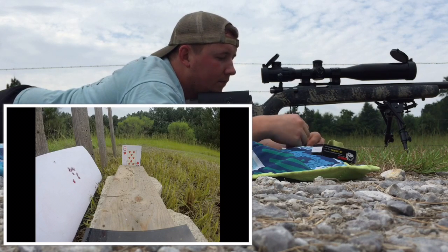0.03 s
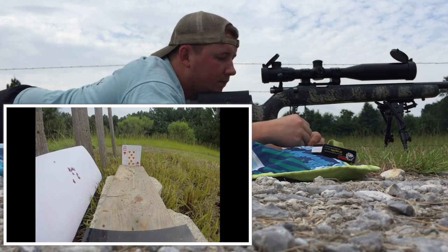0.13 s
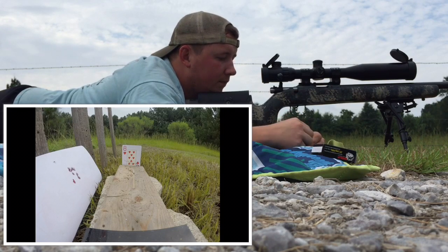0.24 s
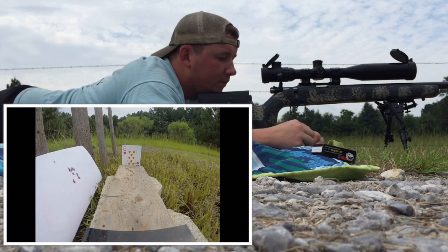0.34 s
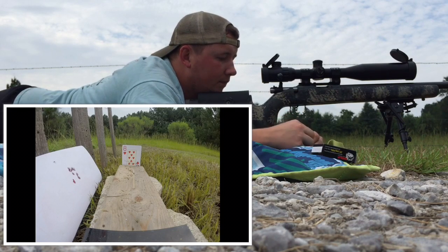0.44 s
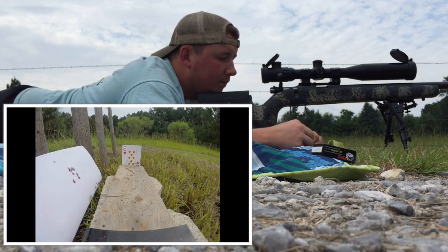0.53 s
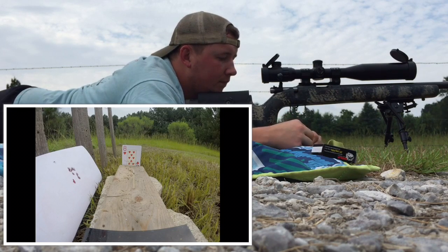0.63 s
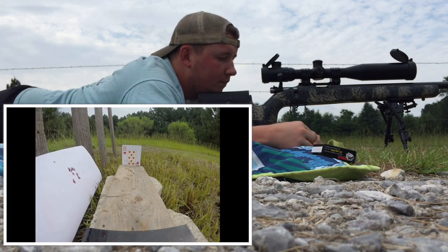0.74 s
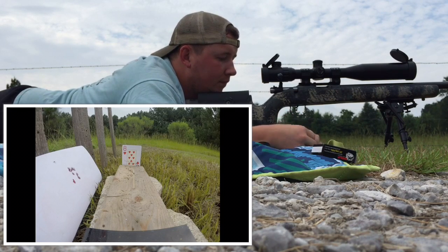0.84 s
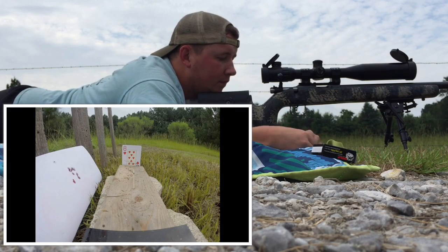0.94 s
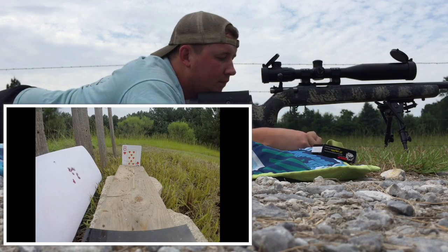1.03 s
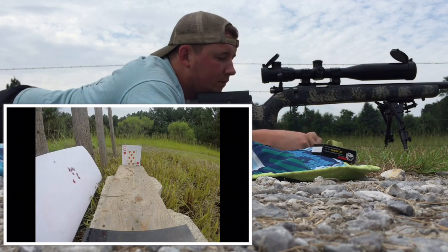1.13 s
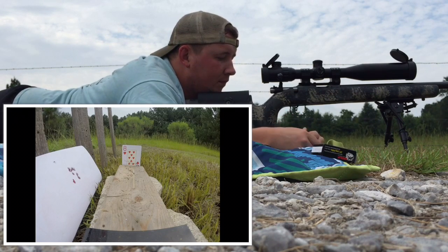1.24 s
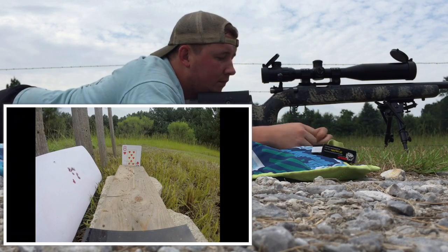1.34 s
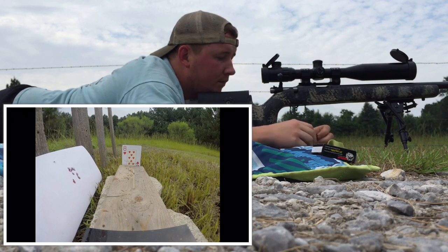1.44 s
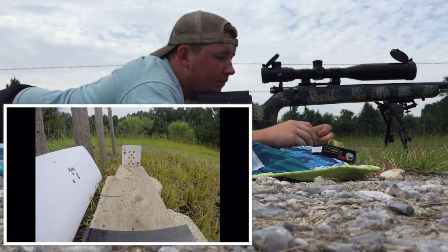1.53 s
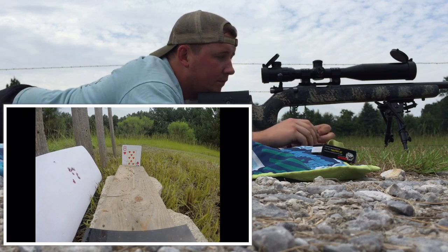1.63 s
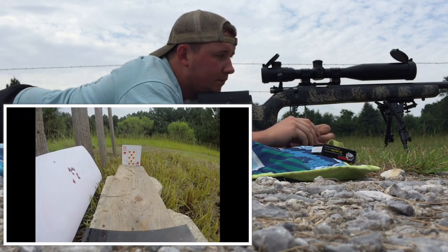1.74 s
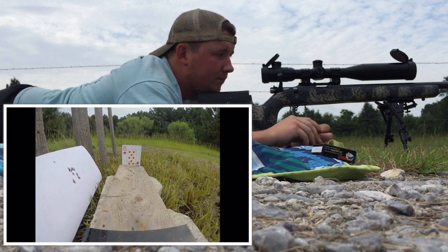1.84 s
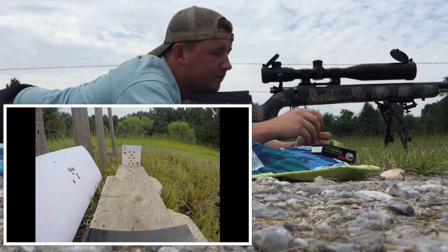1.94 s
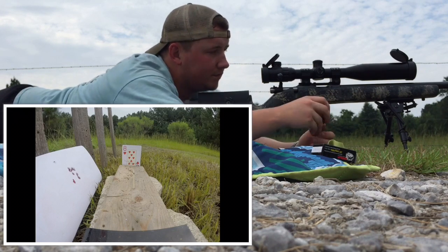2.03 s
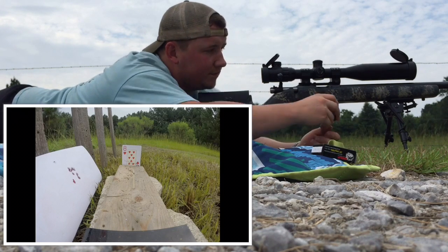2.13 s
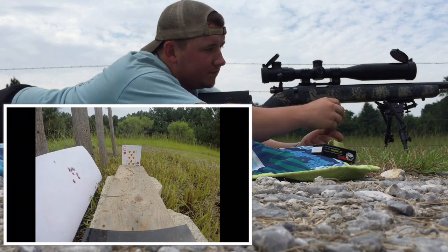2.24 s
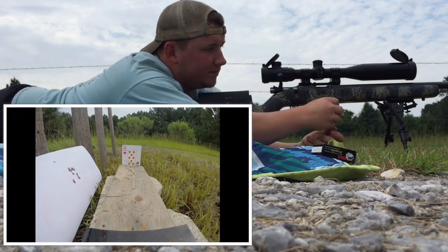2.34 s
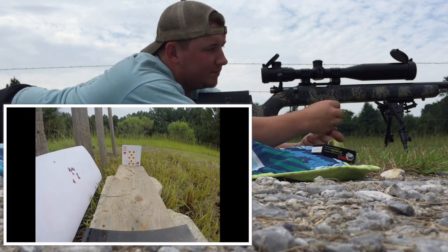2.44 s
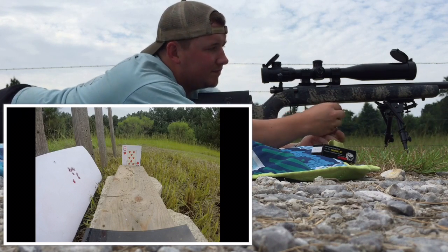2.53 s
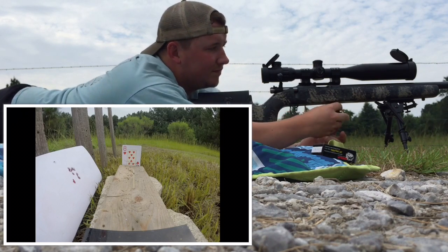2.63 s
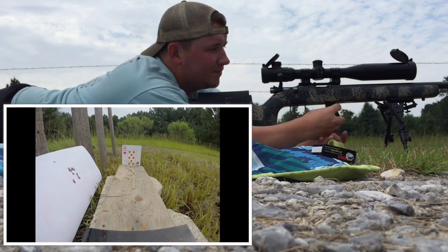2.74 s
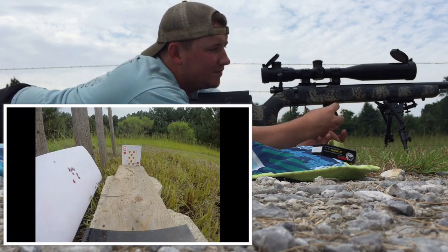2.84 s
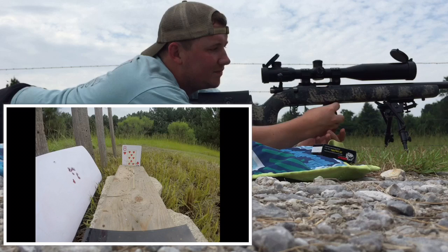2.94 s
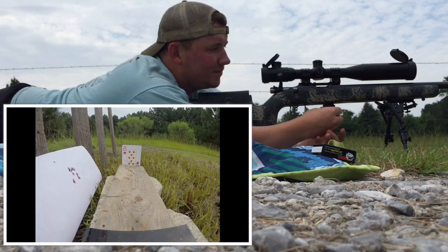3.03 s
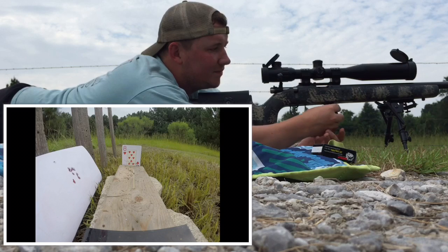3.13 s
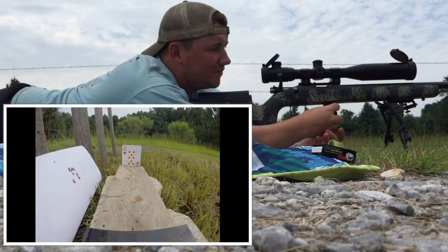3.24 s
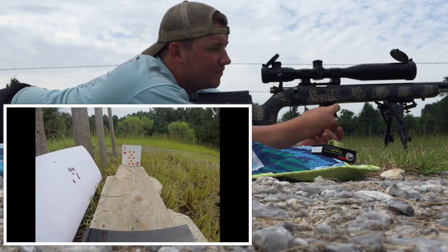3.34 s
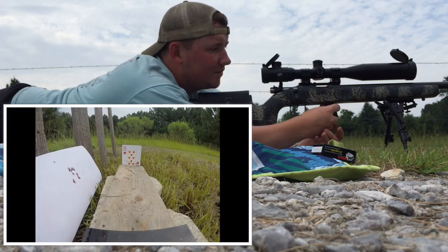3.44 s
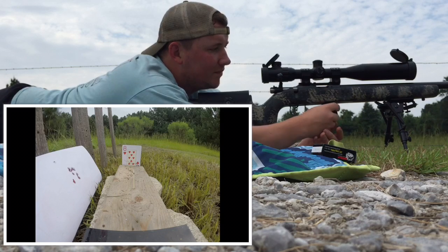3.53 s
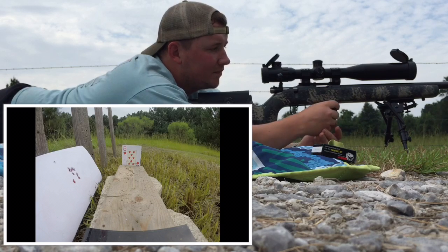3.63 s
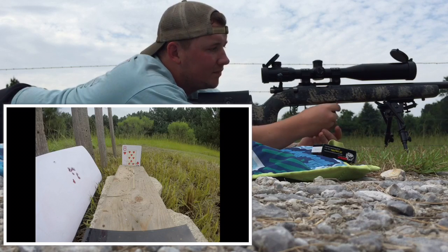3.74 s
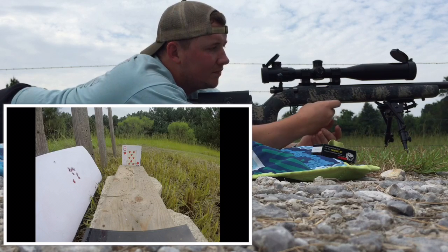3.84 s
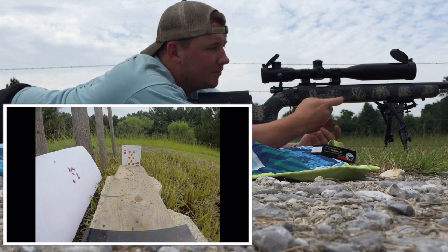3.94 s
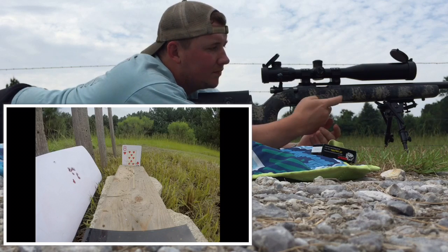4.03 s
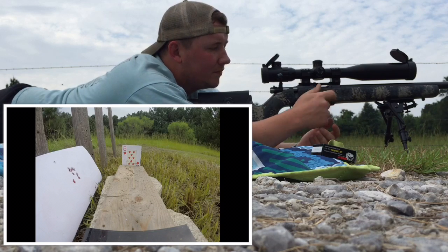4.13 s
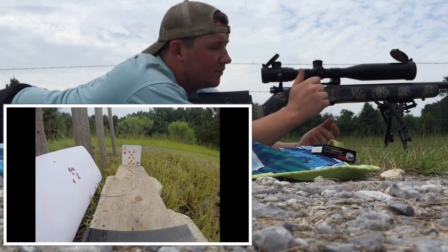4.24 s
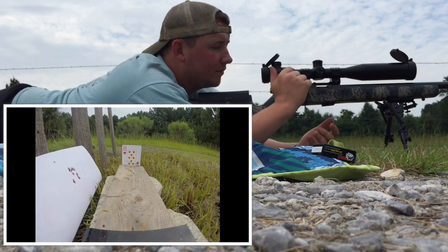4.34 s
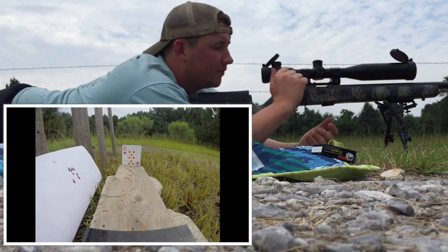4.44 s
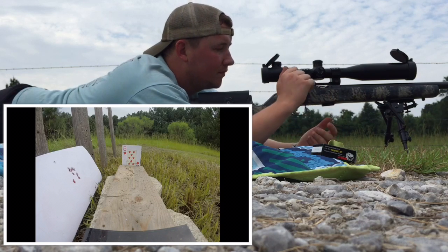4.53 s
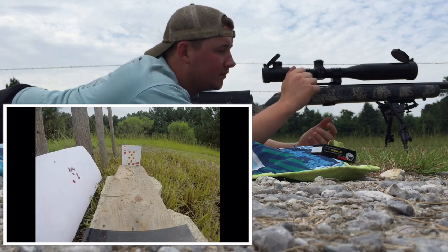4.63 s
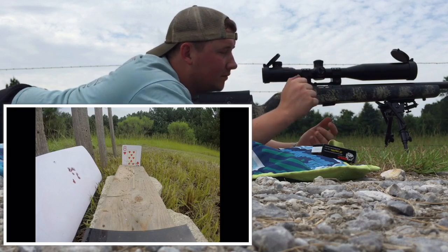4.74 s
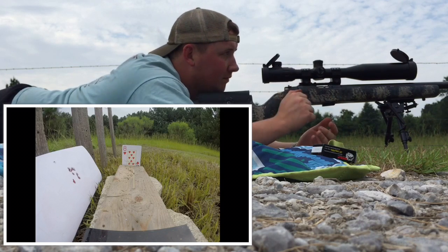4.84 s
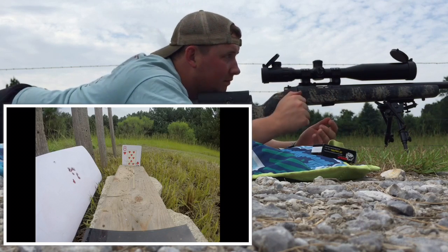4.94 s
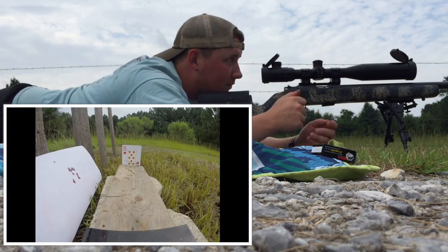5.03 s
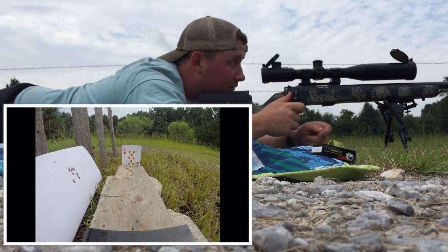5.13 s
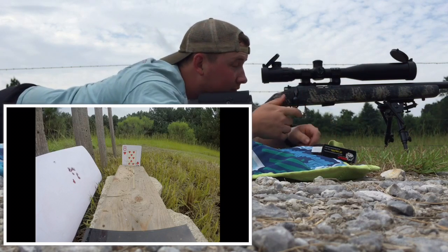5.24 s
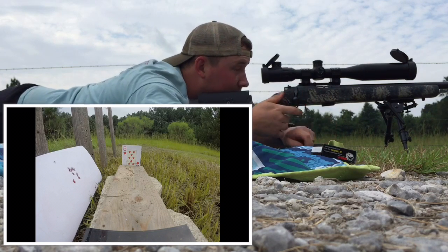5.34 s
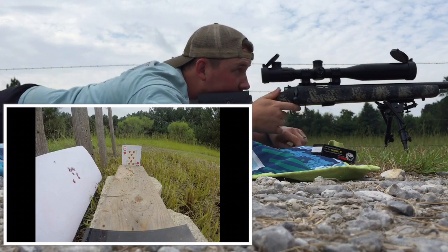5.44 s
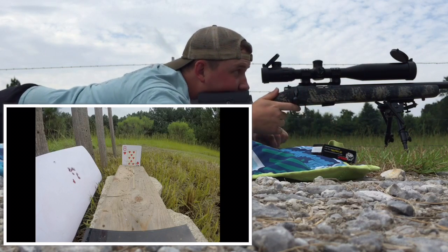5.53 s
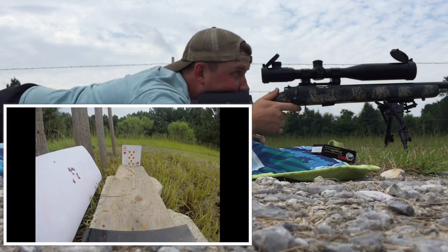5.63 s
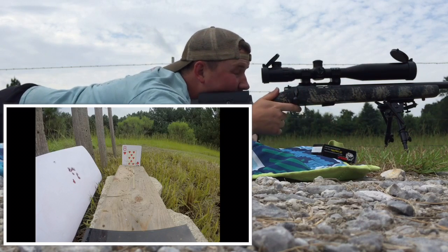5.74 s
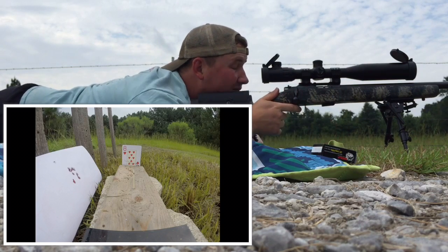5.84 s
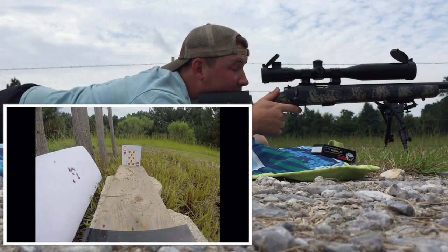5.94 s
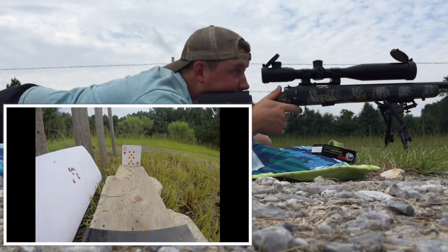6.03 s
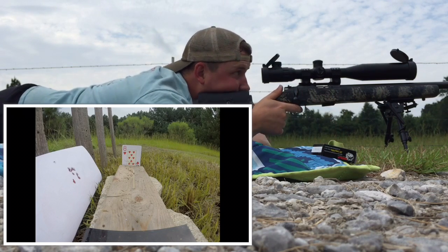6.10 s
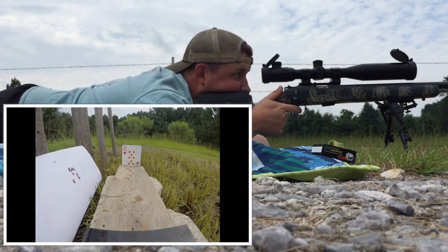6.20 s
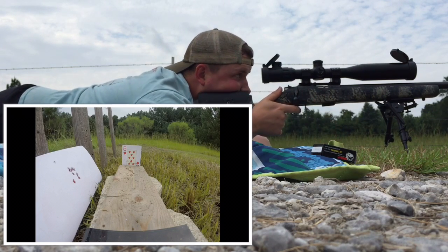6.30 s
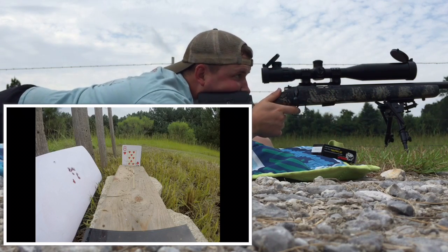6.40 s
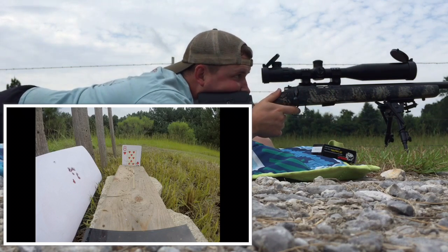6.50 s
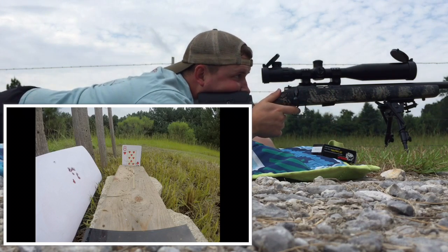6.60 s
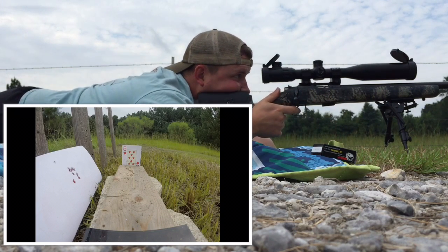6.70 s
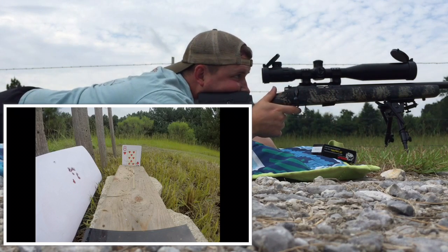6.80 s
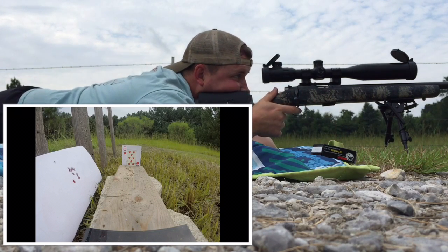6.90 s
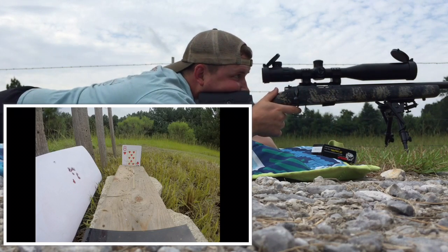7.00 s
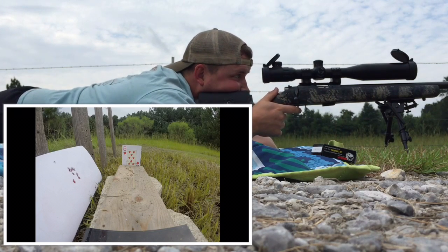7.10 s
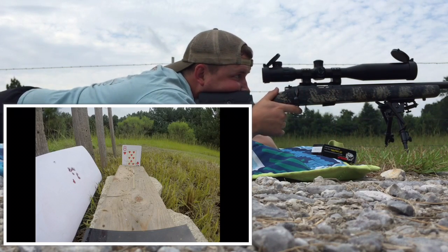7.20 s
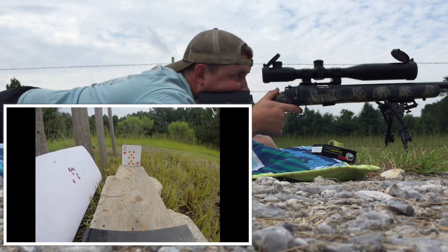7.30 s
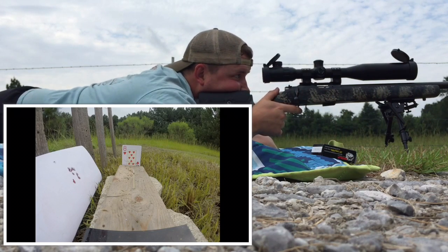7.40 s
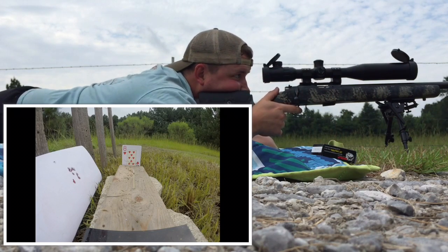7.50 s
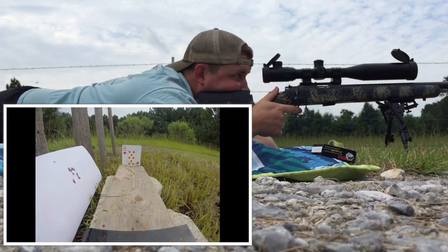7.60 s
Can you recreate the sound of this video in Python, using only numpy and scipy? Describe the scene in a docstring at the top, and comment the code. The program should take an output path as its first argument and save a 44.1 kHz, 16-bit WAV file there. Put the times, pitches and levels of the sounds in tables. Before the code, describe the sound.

A rifle magazine rattles and latches, then the bolt clacks back and shut, outdoors with faint birdsong and a low rumble.

```python
"""In an open field, insects, hiss and a distant rumble sound throughout, and a bird twitters faintly.
Near 1 s a prone shooter handles a cartridge box; one bird gives the first of three whistles and
another starts to warble. A round seats at 2.9 s and the magazine latches at 4 s. The song ends in a
buzz, the bolt slides back to its stop at 4.7 s and locks shut at 4.9 s, and the third whistle follows.
Each steel impact is a broadband crack that excites damped modes of the rifle and of the struck part."""
import sys
import numpy as np
from scipy import signal
from scipy.fft import rfft, irfft, next_fast_len
from scipy.io import wavfile
from scipy.ndimage import uniform_filter1d

SR = 44100
rng = np.random.default_rng(int(sys.argv[2]) if len(sys.argv) > 2 else 0)


def to_wav(s):
    """Save 16-bit WAV."""
    ch = np.atleast_2d(s).T  # columns
    pcm = np.round(np.clip(ch, -1, 1) * 32767)  # PCM
    wavfile.write(sys.argv[1], SR, pcm.astype(np.int16))


N = 337799

# modes of the action and stock: (frequency [Hz], spectral peak [dB], t60 [s])
RIFLE_MODES = [(427, 4.5, 0.058), (613.5, 10.5, 0.053), (746, 8.5, 0.074), (1030, -0.5, 0.035),
               (1290, -4.5, 0.0366), (1270, 0, 0.096), (1700, -3.5, 0.044), (1893, 1, 0.022),
               (2315, -7.5, .05), (2560, -3.5, 0.05), (3050, 0, 0.051), (3990, 2, 0.042),
               (4320, -17.5, 0.12), (4600, 4.5, 0.056), (5000, -6, 0.12), (5550, 5, 0.023), (8360, 4.5, .1),
               (9760, -3, .054), (12400, -13.5, .085), (13600, -12.5, .075)]
# spectral envelope of the cartridge box: (frequency [Hz], level [dB])
BOX_VOICE = [(300, -26), (700, -53), (1020, -17.5), (1250, -37), (1680, -8), (2300, -23), (2900, -20),
             (7200, -29.5), (11300, -14), (13500, -25)]


def snaps():
    """Impact excitation: the box snaps, a round seats, the magazine latches, the bolt stops and locks."""
    # spectral envelopes of the parts: (frequency [Hz], level [dB])
    cartridge_voice = [(300, -22), (1000, -20.5), (1350, -11), (1950, -12.5), (2500, -21), (3100, -10),
                       (4000, -24), (5600, -9.5), (6700, -34), (15000, -37)]
    catch_voice = [(250, -7.5), (500, -23), (770, -3), (1300, -2.5), (1550, -7), (2300, 7.5), (2950, 10),
                   (3600, 7.5), (4000, 3), (4700, -5), (5900, 5), (7000, -3), (11000, 2), (15200, 7.5)]
    stop_voice = [(300, -4.5), (480, 0), (700, 7.5), (1000, 2.5), (1300, 13), (1550, 11), (1850, 16),
                  (2550, 17), (3000, 10), (4300, 5), (5900, 11.5), (6900, 0), (8000, 3), (15000, -2.5)]
    lock_voice = [(290, 2.5), (450, 18.5), (620, 16.5), (880, -2.5), (1250, 17), (1500, 3), (1830, 7),
                  (2500, 2.5), (2900, -5), (4200, 1.5), (6000, 1.5), (7400, -19), (8700, -5.5),
                  (11000, -17.5)]
    out = np.zeros(N)
    # each part has one dominant mode: (frequency [Hz], spectral peak [dB], t60 [s])
    add(out, 1.163, strike(BOX_VOICE, clatter=.0015, rifle_db=4.5, modes=[(4620, 7, .09)]))
    add(out, 2.86, strike(cartridge_voice, clatter=.007, rifle_db=-2, modes=[(1370, 12, .06)]))
    add(out, 4.0374, strike(catch_voice, clatter=.0014, rifle_db=-5, modes=[(5195, 5.5, .12)]))
    add(out, 4.6666, strike(stop_voice, clatter=.003, rifle_db=-3.5, modes=[(1476, 3, .19)]))
    add(out, 4.9484, strike(lock_voice, clatter=.0023, rifle_db=-8, modes=[(624, -17, .056)]))
    return out


def strike(voice, clatter, rifle_db, modes, crack_db=-1, bass_db=-12, swell_s=.0006):
    """Free vibration: after the crack, rifle and part ring on; both are too small to radiate bass."""
    t = np.arange(12288) / SR
    body = amp(rifle_db) * ring(RIFLE_MODES, t) + ring(modes, t)
    blow = amp(crack_db) * crack(t, max(clatter, .0005)) + body * (1 - np.exp(-t / swell_s))
    return colour(blow, [(60, voice[0][1] + bass_db)] + voice)


def crack(t, clatter, rise=.14, life=.94):
    """Contact noise: a quick run of tiny impacts spreads its energy evenly over frequency."""
    envelope = (1 - np.exp(-t / (rise * clatter))) * np.exp(-t / (life * clatter))
    spectrum = rfft(rng.standard_normal(len(t)) * envelope)
    magnitude = np.sqrt(uniform_filter1d(abs(spectrum) ** 2, size=200) + 1e-12)
    return irfft(spectrum / magnitude, len(t)) * (t < t[-1] / 2)


def ring(modes, t):
    """Modal superposition: damped sines, each scaled by the height of its spectral peak."""
    hz, db, t60 = np.transpose(modes)[:, :, None]
    tau = t60 / np.log(1000)
    phase = 2 * np.pi * rng.random(hz.shape)
    return (2 * amp(db) / (tau * SR) * np.exp(-t / tau) * np.sin(2 * np.pi * hz * t + phase)).sum(0)


def rattles():
    """Resonant filtering: light knocks of loose parts are shaped by the receiver's broad resonances."""
    # spectral envelopes: (frequency [Hz], level [dB])
    stock_voice = [(270, 7), (570, 2.5), (1700, 7), (4500, -21), (12000, -26)]
    magazine_voice = [(270, -20.5), (850, -16), (1250, -2.5), (2500, -2.5), (4500, -18), (7000, -31),
                      (12000, -41)]
    bolt_voice = [(270, -16), (570, -5.5), (1700, 0.5), (4500, -9.5), (12000, -21)]
    # fingers on the box: (time [s], level [dB], tilt [dB/octave])
    box_ticks = [(0.865, -7.5, -6.5), (1.149, -12, -1)]
    # hand and shoulder on the stock: (time [s], level [dB], tilt [dB/octave], clatter time [s])
    stock_bumps = [(2.049, -31, -5, 0.0042), (2.791, -31.5, -4.5, 0.0023), (3.388, -37.5, -5, 0.0015),
                   (4.9302, -20.5, 3, .0015), (4.959, -15, 3.5, 0.0035), (5.266, -39.5, -8, .003),
                   (5.31, -20, -1, 0.0056)]
    # the magazine is loaded and seated, then rattles as the rifle is shouldered:
    # (time [s], level [dB], tilt [dB/octave], clatter time [s], spring ring [dB])
    magazine_knocks = [(2.437, -15.5, -3, 0.0045, 5), (2.484, -26, 0, .008, 7), (2.642, -30.5, -7, .004, 9),
                       (2.956, -31, 5.5, 0.0087, 16.5), (2.98, -32.5, -3, .006, 10.5),
                       (3.032, -16.5, 0, 0.0022, -21), (3.31, -23.5, 3, .005, 4), (3.684, -5, 1, 0.003, -2),
                       (3.876, -5.5, 3.5, 0.0026, -32), (3.934, -4.5, 3, 0.0017, -24),
                       (3.939, 5, 1, 0.0016, -9), (3.954, -8.5, 6.5, 0.002, 4.5),
                       (5.355, -21, -6.5, .003, -30)]
    # the bolt in its raceway: (time [s], level [dB], tilt [dB/octave], clatter time [s])
    bolt_ticks = [(4.6145, -12.5, 7, .001), (4.6366, -4, 5.5, .0025), (4.655, -10, 2.5, .002),
                  (4.66, -2.5, 2.5, .0025), (4.676, 2.5, -2.5, .003), (4.798, -11, 0, 0.0057),
                  (4.8348, -0.5, -1.7, .0025)]
    out = np.zeros(N)
    for voice, contacts in [(BOX_VOICE, box_ticks), (stock_voice, stock_bumps),
                            (magazine_voice, magazine_knocks), (bolt_voice, bolt_ticks)]:
        for s, *contact in contacts:
            add(out, s, knock(voice, *contact))
    receiver = [(300, -3.5), (660, 0), (1060, 1), (1300, -1), (1520, -.5), (1850, 1), (2550, -2),
                (3600, -.5), (4400, -4), (5800, 2), (6900, -4.5), (8500, 2), (11500, -.5), (15000, -.5)]
    return colour(out, receiver)


def knock(voice, db, tilt, clatter=.0059, spring_db=-27, rifle_db=-4, pivot_hz=1700):
    """Contact hardness tilts the spectrum: a harder knock rings rifle and magazine more brightly."""
    # modes of the magazine and its spring: (frequency [Hz], spectral peak [dB], t60 [s])
    magazine_modes = [(1304, 14.5, 0.053), (1460, 13.5, .2), (2810, 1.5, 0.075), (4640, -5.5, 0.13),
                      (5033, -12, 0.22)]
    tilted = [(hz, voice_db + db + tilt * np.log2(hz / pivot_hz)) for hz, voice_db in voice]
    spring = [(hz, mode_db + spring_db, t60) for hz, mode_db, t60 in magazine_modes]
    return strike(tilted, clatter, rifle_db, spring)


def bolt_slide(grit_db=5, slips_hz=330, modes_db=-4):
    """Stick-slip friction of steel on steel drives the modes of the action."""
    # back, then forward: (middle [s], length [s], level [dB])
    strokes = [(4.611, .01, -52), (4.637, .01, -33), (4.664, .012, -43), (4.8, .022, -62)]
    grit = swells(strokes) * unit(rng.standard_normal(N) * amp(grit_db * drift(slips_hz)))
    body = signal.fftconvolve(grit, ring(RIFLE_MODES, np.arange(SR // 8) / SR))[:N]
    voice = [(150, -14), (500, 2), (1500, 5), (3600, 7.5), (5800, -1.5), (7000, -7.5), (10000, -8),
             (16000, -6.5)]
    return colour(grit + amp(modes_db) * body, voice)


def rub(grain_db=2.5, grains_hz=160):
    """Sliding friction of hand and magazine along the stock makes dull, uneven noise."""
    # (middle [s], length [s], level [dB])
    strokes = [(2.03, 0.065, -68.5), (2.18, 0.11, -69.5), (2.42, 0.13, -74), (2.73, 0.32, -68),
               (3.59, 0.22, -66), (3.865, 0.03, -59), (3.945, 0.072, -60.5), (4.635, 0.046, -53),
               (4.92, 0.24, -63), (5.3, .14, -66.5), (5.92, .35, -73)]
    voice = [(150, -18.5), (400, -1.5), (620, 4.5), (900, -3.5), (1400, -1.5), (3500, -10), (6000, -12),
             (15000, -29)]
    friction = noise(lambda hz: amp(level_at(voice, hz)))
    return swells(strokes) * unit(friction * amp(grain_db * drift(grains_hz)))


def thumps(swell_s=.0048):
    """Damped low oscillations follow as rifle and elbows rock on the ground."""
    # (time [s], frequency [Hz], level [dB], t60 [s])
    pushes = [(1.184, 108, -45.5, 0.095), (2.865, 94, -48, 0.14), (4.645, 74.4, -51, 0.16),
              (4.863, 44.3, -48, 0.25), (4.943, 51.5, -48, 0.34), (5.325, 68.1, -54, 0.18)]
    out, t = np.zeros(N), np.arange(SR // 2) / SR
    for s, hz, db, t60 in pushes:
        envelope = amp(db - 60 * t / t60) * (1 - np.exp(-t / swell_s))
        add(out, s, envelope * np.sin(2 * np.pi * hz * t))
    return out


def whistler(wander_hz=18, wander_db=.8, climb_hz_per_s=520):
    """Slow frequency modulation: each thin whistle flicks down, scoops up, climbs and finally droops."""
    # (time [s], length [s], pitch [Hz], level [dB], swell over the note [dB])
    whistles = [(1.488, 0.35, 5660, -58, -2), (3.492, 0.35, 5710, -53.5, 6.5),
                (5.278, 0.37, 5630, -57.5, -1.5)]
    flick_hz, flick_s = 417, .009
    scoop_hz, scoop_s = 422, .036
    droop_hz, droop_s = 209, .02
    out = np.zeros(N)
    wander = drift(11)
    for s, length, pitch, db, swell_db in whistles:
        t = np.arange(0, length, 1 / SR)
        effort = wander[round(s * SR):][:len(t)]
        onset_hz = flick_hz * np.exp(-t / flick_s) - scoop_hz * np.exp(-t / scoop_s)
        hz = pitch + onset_hz + climb_hz_per_s * t - droop_hz * np.exp((t - length) / droop_s)
        level_db = db + swell_db * (t / length - .5) + wander_db * effort
        add(out, s, note(hz + wander_hz * effort, level_db, waver=.0011, fade=.11))
    return out


def warbler(base_hz=3800, climb_hz_per_s=3500, point_hz=2670, point_s=.022, fade_db_per_s=35):
    """Frequency modulation: gliding notes, and two flourishes whose pitch shoots up and falls back."""
    # quick slurs, plus faint, thin, level whistles near 4 kHz from far off:
    # (time [s], length [s], start pitch [Hz], end pitch [Hz], level [dB])
    notes = [(1.762, .042, 3750, 2850, -65), (1.788, 0.037, 2900, 3500, -64.5),
             (1.931, .033, 3700, 3120, -72.5), (1.984, 0.053, 3250, 2700, -72.5),
             (2.308, 0.18, 4030, 3940, -76), (2.832, .029, 2920, 3400, -65),
             (2.931, 0.091, 3150, 3700, -69.5), (3.028, 0.18, 3950, 3820, -79),
             (3.122, .033, 3000, 2630, -73), (3.254, 0.041, 2770, 3860, -72),
             (3.313, 0.044, 3700, 2450, -67.5), (3.474, 0.027, 3910, 2900, -65.5),
             (3.507, 0.03, 3710, 2850, -64.5), (3.631, 0.021, 2870, 3500, -59.5),
             (3.65, .028, 3390, 2600, -64), (3.704, .064, 2330, 2880, -66), (3.813, .049, 6150, 6400, -63),
             (4, .032, 2780, 3550, -63), (4.107, 0.037, 3920, 2400, -67), (4.144, 0.042, 6080, 6380, -61.5),
             (4.15, 0.043, 2340, 3750, -66), (4.325, 0.07, 2420, 3900, -66.5),
             (4.387, .04, 3500, 2430, -72), (4.842, .06, 4450, 3350, -64.5),
             (7.173, .24, 4000, 3980, -81.5)]
    # (time of the pitch peak [s], level [dB])
    flourishes = [(3.967, -63), (4.31, -64.5)]
    lead_s, trail_s = .072, .093
    out = np.zeros(N)
    for s, *path, db in notes:
        add(out, s, slur(glide(*path), db))
    t = np.arange(-lead_s, trail_s, 1 / SR)
    pointed = base_hz + climb_hz_per_s * t + point_hz * np.exp(-abs(t) / point_s)
    for s, db in flourishes:
        add(out, s - lead_s, slur(pointed, db - fade_db_per_s * t))
    return out


def buzz(start_s=4.485, sweeps_per_s=88, swing=.12):
    """Sawtooth modulation of a rising tone: fast upward sweeps fuse into the warbler's closing buzz."""
    out = np.zeros(N)
    hz = glide(.125, start_hz=3150, end_hz=5700)
    sweep = np.arange(len(hz)) / SR * sweeps_per_s % 1
    tone = note(hz * (1 + swing * (2 * sweep - 1)), db=-65.5, waver=.004, fade=.4)
    add(out, start_s, tone * np.sin(np.pi * sweep))
    return out


def twitter(length_s=.04, centre_hz=3150, sweep=.115, spread=.12):
    """A jittered chirp train: faint slurs go up or down by chance, at loosely even intervals."""
    # (start [s], end [s], slur rate [1/s], level [dB])
    bouts = [(0.152, 0.651, 8, -77), (1.901, 3.65, 10, -76.5), (3.45, 4.45, 7, -74.5)]
    out = np.zeros(N)
    for start, end, rate, db in bouts:
        for s in np.arange(start, end, 1 / rate):
            late, way, high, long = rng.uniform(-1.1, 1, 4)
            hz, step = centre_hz * (1 + spread * high), 1 + sweep * np.sign(way)
            path = glide(length_s * (1 + long / 2), hz * step, hz / step)
            add(out, s + late / rate / 2, slur(path, db))
    return out


def slur(hz, db):
    """Pitch jitter roughens a warbled note: the wider its sweep, the raspier it is."""
    octaves = np.log2(hz.max() / hz.min())
    return note(hz, db, waver=.002 + .015 * octaves, fade=.35, flutter_db=1.6)


def glide(length, start_hz, end_hz):
    """A hyperbolic sweep: the period changes evenly, so the pitch moves fastest where it is high."""
    return 1 / np.linspace(1 / start_hz, 1 / end_hz, round(max(length, .01) * SR))


def note(hz, db, waver, fade, flutter_db=1.06):
    """Random modulation leaves a bird's nearly pure tone slightly unsteady in pitch and strength."""
    pitch, strength = (unit(uniform_filter1d(z, size=100)) for z in rng.standard_normal((2, len(hz))))
    turns = np.cumsum(hz * (1 + waver * pitch)) / SR
    envelope = amp(db + flutter_db * strength) * signal.windows.tukey(len(hz), fade)
    return np.sqrt(2) * envelope * np.sin(2 * np.pi * turns)


def open_air(rumble_db=-61.5, gust_db=2.5, hiss_db=-71.5, hiss_swell_db=.8):
    """Coloured noise under slow amplitude modulation: a distant rumble and the hiss of open air."""
    # (frequency [Hz], relative spectral density [dB])
    rumble_spectrum = [(12, -71.5), (20, -34.5), (27, -26), (29, -18.5), (34, -21.5), (45, -5.5), (75, 0.5),
                       (123, -1.5), (166, -9), (296, -20), (352, -20), (500, -30), (650, -61.5),
                       (1100, -120)]
    hiss_spectrum = [(300, -11), (500, 0.5), (1000, -3), (2000, -4), (3200, -5.5), (6300, -8.5),
                     (9500, -11.5), (10500, -17), (11600, -14.5), (16000, -18.5)]
    # the low rumble swells briefly: (middle [s], length [s], level [dB])
    rumble_swells = [(2.42, 0.23, -68), (4.97, .25, -60), (5.57, 0.14, -62.5), (5.91, 0.11, -66.5)]
    rumble_gain = amp(rumble_db + gust_db * drift(5)) + swells(rumble_swells)
    rumble = rumble_gain * noise(lambda hz: amp(level_at(rumble_spectrum, hz)))
    hiss_gain = amp(hiss_db + hiss_swell_db * drift(.67))
    return rumble + hiss_gain * noise(lambda hz: amp(level_at(hiss_spectrum, hz)))


def insects(shimmer_db=.97, shimmer_hz=55):
    """Narrow-band noise: an insect chorus merges into steady, shimmering bands."""
    # (centre [Hz], width [Hz], level [dB])
    bands = [(8063, 360, -74.5), (4870, 210, -87), (9000, 500, -91.5)]
    chorus = sum(amp(db) * noise(lambda hz: np.exp(-((hz - centre) / width) ** 2 / 2))
                 for centre, width, db in bands)
    return chorus * amp(shimmer_db * drift(shimmer_hz))


def scatter(x, t60, dull_hz, echoes_per_s=3000):
    """Scattering from gravel, grass and trees returns sparse, decaying reflections."""
    t = np.arange(SR // 2) / SR
    echoes = rng.standard_normal(len(t)) * (rng.random(len(t)) < echoes_per_s / SR)
    decay = amp(-60 * t / t60) * (t > .005)
    response = colour(echoes * decay, [(100, 0), (dull_hz, 0), (16000, -9)])
    return signal.fftconvolve(x, response / np.linalg.norm(response))[:N]


def colour(x, points, size=2048):
    """A minimum-phase filter through (frequency [Hz], gain [dB]) points keeps attacks sharp."""
    log_gain = np.log(amp(level_at(points, abs(np.fft.fftfreq(size, 1 / SR)))))
    taps = np.fft.ifft(np.exp(np.conj(signal.hilbert(log_gain)))).real
    return signal.fftconvolve(x, taps[:size // 2])[:len(x)]


def swells(strokes):
    """Exponential envelopes: each stroke builds up to its middle and dies away."""
    t = np.arange(N) / SR
    return sum(amp(db) * np.exp(-2 * abs(t - s) / max(length, .002)) for s, length, db in strokes)


def noise(gain):
    """Spectral shaping: noise of rms 1 whose spectrum follows gain(Hz)."""
    size = next_fast_len(N, True)
    spectrum = rfft(rng.standard_normal(size)) * gain(np.fft.rfftfreq(size, 1 / SR))
    return unit(irfft(spectrum, size)[:N])


def drift(rate_hz):
    """Low-passed noise: a smooth random curve of rms 1."""
    return noise(lambda hz: np.exp(-(hz / rate_hz) ** 2))


def level_at(points, hz):
    """Interpolation of a spectrum on a log-frequency axis."""
    point_hz, db = np.transpose(points)
    return np.interp(np.log(hz + 1), np.log(point_hz + 1), db)


def add(mix, s, sound):
    """Superposition: a sound joins the mix at time s."""
    part = mix[max(round(s * SR), 0):][:len(sound)]
    part += sound[:len(part)]


def amp(db):
    """Decibels to amplitude ratio."""
    return 10 ** (np.asarray(db) / 20)


def unit(x):
    """Normalisation to rms 1."""
    return x / np.sqrt(np.mean(x ** 2) + 1e-20)


def scene():
    """Direct and reflected sound add: the rifle is close and dry, the birds carry faint echoes."""
    gun = snaps() + rattles() + bolt_slide() + rub()
    whistle = whistler()
    song = warbler() + buzz() + twitter()
    gun += amp(-30.5) * scatter(gun, t60=.18, dull_hz=4000)
    whistle += amp(-24) * scatter(whistle, t60=.43, dull_hz=6000)
    song += amp(-11) * scatter(song, t60=.3, dull_hz=6000)
    return (gun + thumps() + whistle + song + open_air() + insects())[None]


def record(dry):
    """Band limiting: the sound passes between 30 Hz and 16.2 kHz."""
    low_cut = signal.butter(4, 30, "highpass", fs=SR, output="sos")
    high_cut = signal.firwin(255, 16200, window=("kaiser", 9), fs=SR)
    return signal.oaconvolve(signal.sosfilt(low_cut, dry), high_cut[None], "same")


dry = scene()
out = record(dry)
to_wav(out)
```